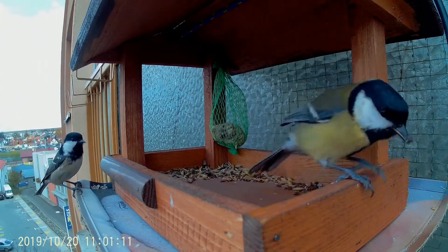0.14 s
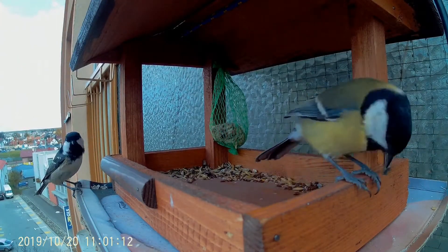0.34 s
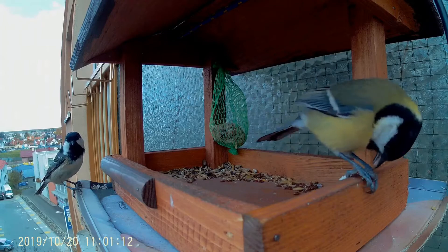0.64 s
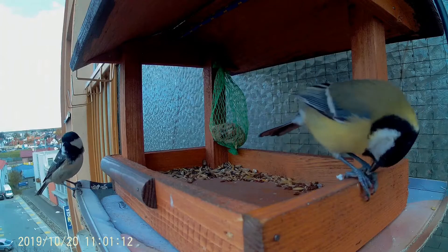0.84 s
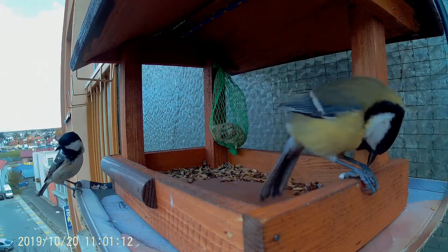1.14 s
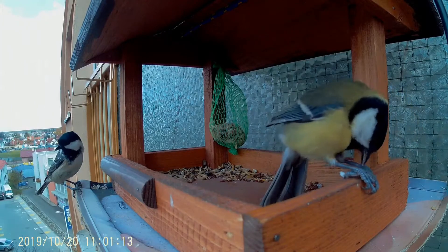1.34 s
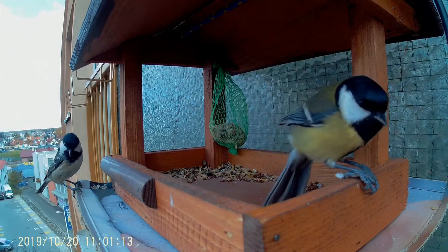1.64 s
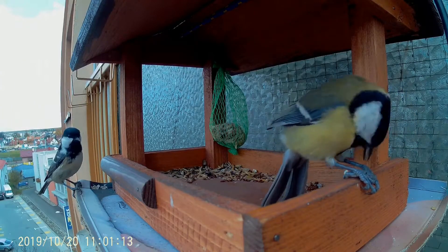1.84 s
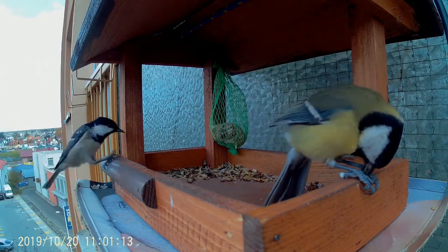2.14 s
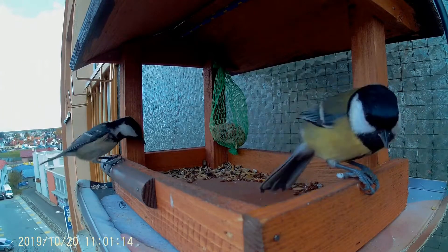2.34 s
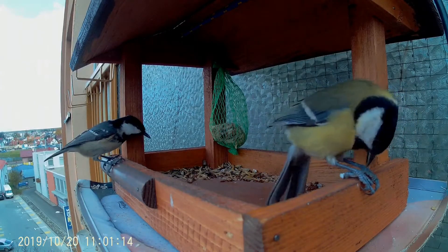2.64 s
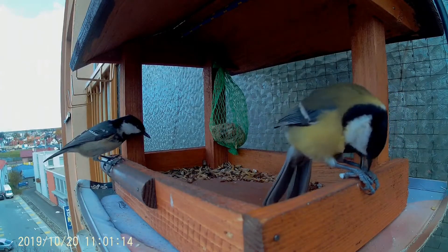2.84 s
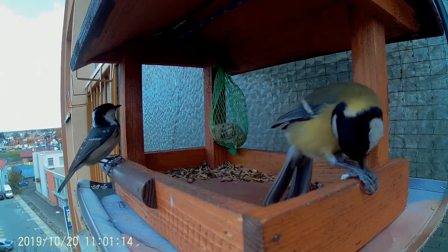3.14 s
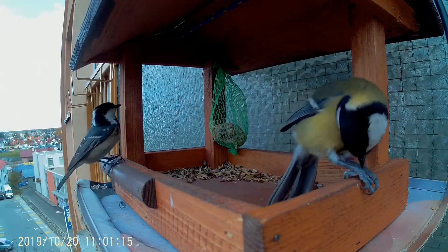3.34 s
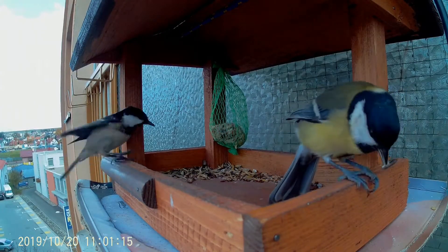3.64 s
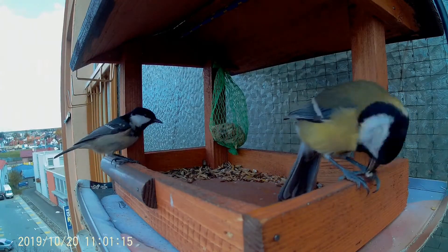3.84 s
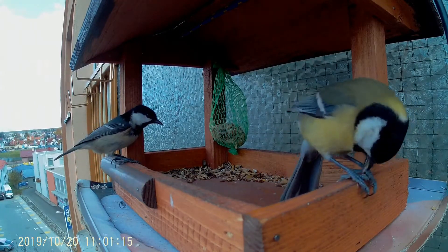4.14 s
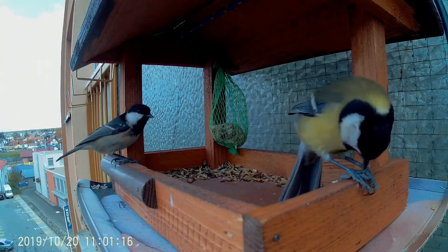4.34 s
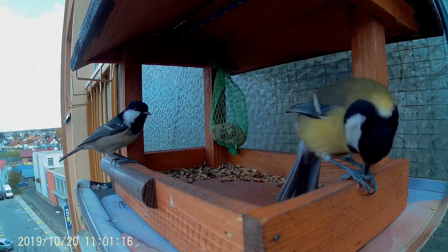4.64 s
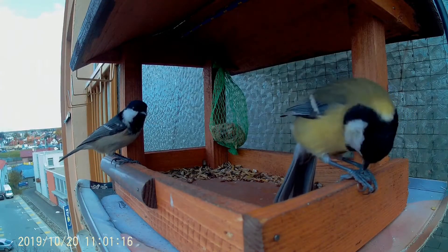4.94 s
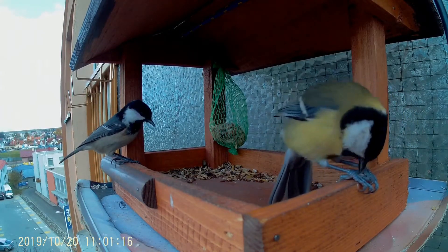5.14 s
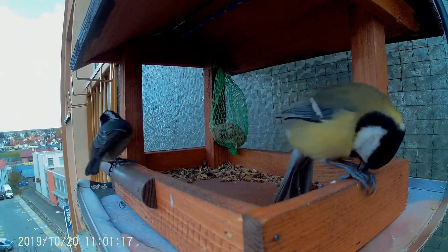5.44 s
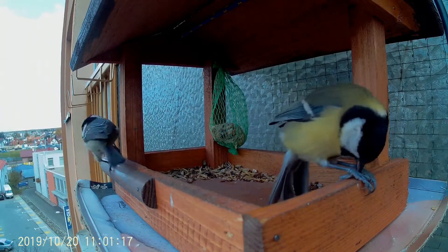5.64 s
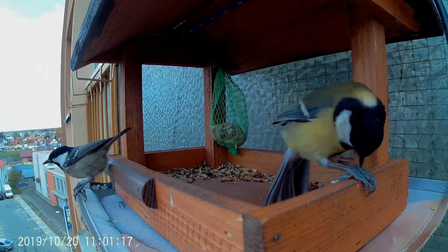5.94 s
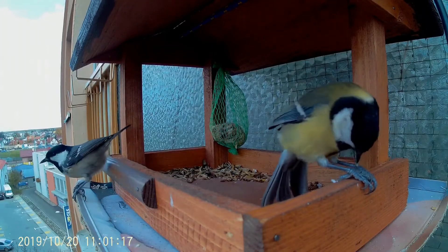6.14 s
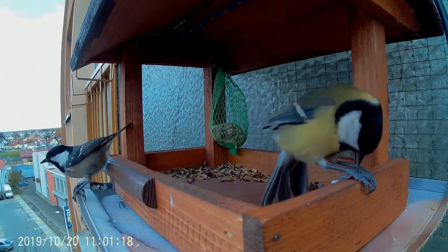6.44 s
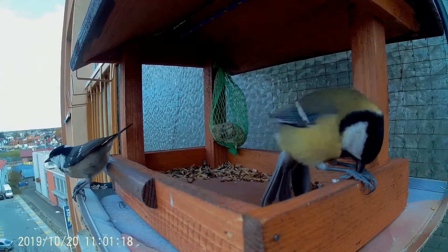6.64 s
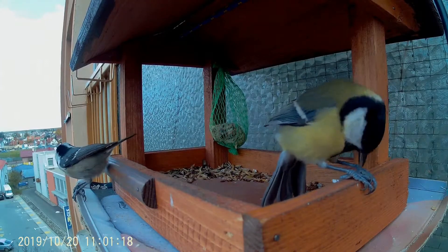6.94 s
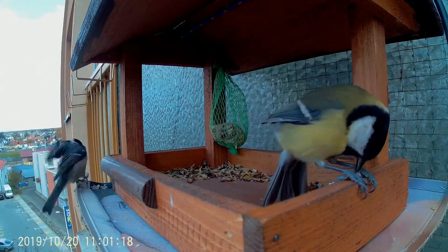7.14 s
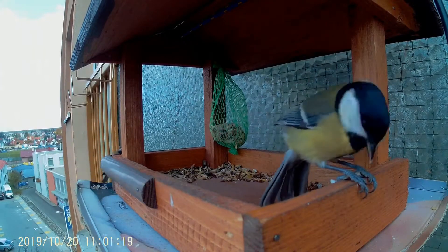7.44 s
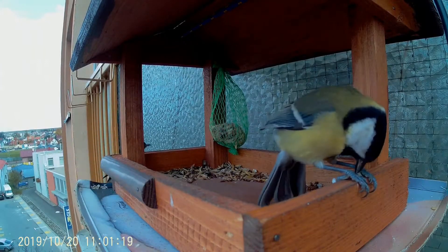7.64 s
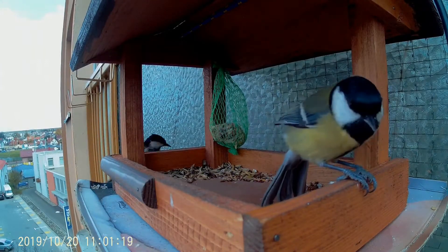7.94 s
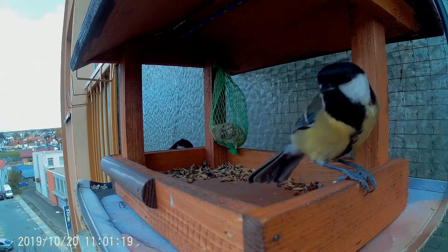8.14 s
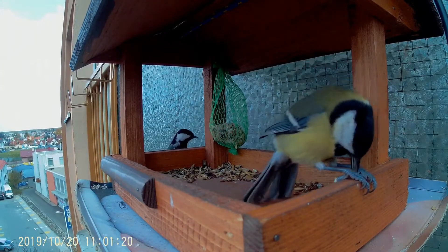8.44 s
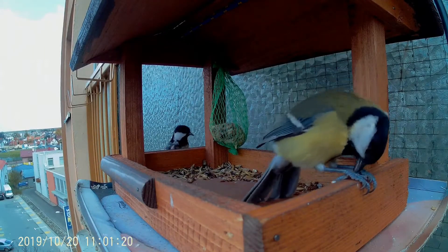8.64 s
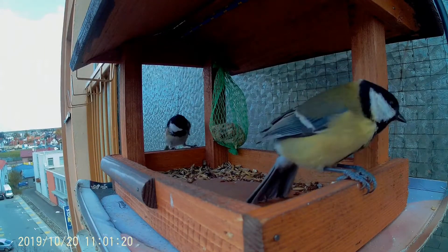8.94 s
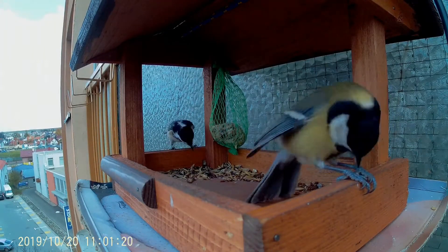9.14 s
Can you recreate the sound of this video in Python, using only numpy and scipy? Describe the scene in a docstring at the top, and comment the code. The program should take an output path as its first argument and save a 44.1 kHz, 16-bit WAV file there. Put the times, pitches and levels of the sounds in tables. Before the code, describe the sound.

Outdoors at a window feeder, with the microphone on the small wooden tray. Low wind rumbles throughout over faint hiss, booming in the hollow floor. A beak knock and scrape open at 0 s, followed by light taps and scratching around 0.3 and 0.7 s, then firmer blows from 1.1 to 1.6 s. At 2.06 s a tiny, very high chirp coincides with a knock and scrape; a gust and rattling contacts follow at 2.3-2.5 s. Quick pecks cluster at 3.2-3.8 s. After sparser taps, sharp hollow knocks land at 4.4 and 4.8-5.0 s. Pecks and crisp shell cracks continue from 5.2 to 7.2 s, with strong jolting gusts at 5.9-6.6 s and a fainter chirp at 6.33 s. Gusts return at 7.4 and 8.1 s. Cracks and a brief low claw hum come near 8.2 s; final taps cluster around 8.9 s under continuing wind.

```python
"""Gusts rumble at a microphone on the wooden tray of a window feeder and boom in its floor; band-limited noise hisses.
From the start a small bird hammers a seed: filtered noise and random slips scrape the wood, bursts of fractures
crack the shell, and blows ring decaying modes of rim and floor. Near 2.1 s and 6.3 s a second bird chirps with
two gliding sines, one for each half of its voice box. Near 8.2 s a juddering claw hums on the floor as one sine."""
import sys
import numpy as np
from scipy import signal
from scipy.fft import rfft, irfft, next_fast_len
from scipy.io import wavfile
from scipy.ndimage import uniform_filter1d, map_coordinates

SR = 44100
rng = np.random.default_rng(int(sys.argv[2]) if len(sys.argv) > 2 else 0)


def log_audio(samples):
    """Write samples as a 16-bit WAV file to the path given in sys.argv[1]."""
    # one column per channel
    frames = np.atleast_2d(samples).T
    # limit to full scale, then quantise
    limited = np.clip(frames, -1, 1)
    pcm = np.round(limited * 32767).astype(np.int16)
    wavfile.write(sys.argv[1], SR, pcm)


N = 409688


def amp(db):
    """Decibels to gain."""
    return 10 ** (np.asarray(db) / 20)


def unit(x):
    """x at rms 1."""
    return x / np.sqrt(np.mean(x ** 2) + 1e-20)


def along(points, hz):
    """(Hz, value) points interpolated on a log frequency axis."""
    point_hz, value = np.transpose(points)
    return np.interp(np.log(hz + 1), np.log(point_hz + 1), value)


def curve(points):
    """(seconds, value) points interpolated to one value per sample."""
    point_s, value = np.transpose(points)
    return np.interp(np.arange(N) / SR, point_s, value)


def wobble(knots_per_s):
    """A smooth random curve through normally distributed knots."""
    knots = rng.standard_normal(int(N * knots_per_s / SR) + 4)
    return map_coordinates(knots, [np.arange(N) * knots_per_s / SR])


def filtered(x, response):
    """x times a response of frequency in Hz."""
    size = next_fast_len(N + SR // 2)
    return irfft(rfft(x, size) * response(np.fft.rfftfreq(size, 1 / SR)), size)[:N]


def coloured_noise(size, spectrum):
    """Noise of a given size per sample, shaped by a spectrum in dB; rms 1."""
    return unit(filtered(size * rng.standard_normal(N), lambda hz: amp(along(spectrum, hz))))


def add(out, start_s, sound):
    """Mixes a sound in at its start time."""
    part = out[max(0, round(start_s * SR)):][:len(sound)]
    part += sound[:len(part)]


def jerks(size, count, spiky):
    """size tiny slips of random sign and very uneven strength, scattered over count samples."""
    when, strength, sign = rng.random((3, size))
    slips = np.sign(sign - .5) * (1.001 - strength) ** -spiky
    return np.bincount((when * count).astype(int), slips, count)


def ring(modes, scatter_db=0):
    """Impulse response of decaying sines; modes that start in opposite directions make it swell first."""
    hz, db, t60_s, way = np.transpose(modes)[:, :, None]
    t = np.arange(SR // 8) / SR
    decay = amp(db + scatter_db - 60 * t / t60_s)
    return np.sum(np.sign(way) * decay * np.sin(2 * np.pi * hz * t), axis=0)


# Standard deviations from blow to blow: share of each mode's frequency, dB of its decay time.
DETUNE_SHARE, DAMPING_DB = .015, 1.5


def struck(modes, force, contact_s, spread_db):
    """Randomly varied modes driven by a force smoothed over the contact time; peak 1."""
    force = np.convolve(force, np.hanning(max(3, round(contact_s * SR))))
    chance = rng.standard_normal((len(modes), 2))
    varied = [(hz * (1 + DETUNE_SHARE * a), db, t60_s * amp(DAMPING_DB * b), way)
              for (hz, db, t60_s, way), (a, b) in zip(modes, chance)]
    scatter_db = rng.normal(0, spread_db, (len(modes), 1))
    sound = signal.fftconvolve(ring(varied, scatter_db), force)
    return sound / np.abs(sound).max()


# Steady wind. Each row: time in seconds, rumble level in dB.
STEADY_WIND = [(0.0, -52.5), (0.59, -56), (1.42, -45), (2.3, -47.5), (2.48, -43), (2.69, -47.5),
               (3.39, -43), (3.91, -52), (5.38, -62), (5.69, -52.5), (6.0, -39), (6.6, -41.5),
               (6.96, -50.5), (7.19, -63), (7.35, -38), (7.63, -41), (7.79, -47), (9.29, -46)]
# Gusts on top. Each row: strongest moment in seconds, length in seconds, roar level in dB before flutter,
# extra tray boom in dB.
GUST_ROWS = [(0.842, 0.15, -44, -1), (1.194, 0.16, -37, -12), (1.407, 0.1, -35.5, -1),
             (1.785, 0.086, -41, -7), (1.96, 0.054, -36, -6), (2.402, 0.18, -32.5, 0),
             (2.575, 0.17, -34.5, 6.5), (2.874, 0.28, -53, 13), (3.032, 0.13, -49, 13),
             (3.22, 0.19, -39.5, 1), (4.064, 0.22, -46, 0), (5.92, 0.24, -39.5, 3), (6.07, 0.16, -46, 9),
             (6.161, 0.18, -36, 5.5), (6.451, 0.51, -28.5, 3), (7.357, 0.71, -37.5, 1.5),
             (7.614, 0.093, -47, 12), (7.738, 0.17, -32.5, -21), (8.08, 0.22, -30.5, -4.5),
             (8.287, 0.084, -37, 4), (8.399, 0.14, -36.5, 3.5), (8.97, 0.16, -39, -16)]
# Sharp puffs that jolt the tray. Each row: time in seconds, peak in dB.
PUFF_ROWS = [(1.182, -35), (1.215, -40), (5.971, -22), (6.06, -25.5), (6.094, -24), (6.211, -24.5),
             (6.329, -25.5), (6.456, -22.5), (7.392, -22), (7.718, -32), (8.075, -41), (8.096, -24),
             (8.353, -33.5)]
# Spectra of the steady rumble and the gusts' roar. Each row: frequency in Hz, relative density in dB per Hz.
RUMBLE_SPECTRUM = [(12, -65.5), (22, -8.5), (50, -3.5), (110, -1.5), (200, -5), (350, -7), (550, -14),
                   (800, -50), (1200, -67.5), (2000, -120)]
ROAR_SPECTRUM = [(12, -59), (25, -10), (50, -11), (110, 2.5), (230, 0.5), (350, -6), (500, -10), (650, -23),
                 (850, -37.5), (1200, -64), (2000, -120)]
# Tray floor modes. Each row: frequency in Hz, relative level in dB, t60 in seconds, first direction as a sign.
FLOOR_MODES = [(300.5, -7.5, 0.11, 1), (329.1, -3, 0.085, 1), (408.3, 2.5, 0.073, -1), (468, -24, 0.12, -1),
               (561, -24, 0.076, -1), (608.5, -22, 0.12, 1)]
GUST_RISE_SHARE = 0.35  # of a gust's length
USUAL_WIND_DB, BOOM_AT_USUAL_DB, BOOM_DB_PER_WIND_DB = -45, -50.5, 1
FLUTTER_DB, SHAKE_UNEVEN_DB = 4.5, 3  # depth of the quick swells; flutter is in gusts and boom


def boom_gain(wind_db):
    """Gain of the tray's boom, which follows the wind level."""
    return amp(BOOM_AT_USUAL_DB + BOOM_DB_PER_WIND_DB * (wind_db - USUAL_WIND_DB))


def wind():
    """Lumpy turbulence rumbles at the microphone and shakes the floor of the tray; sharp puffs jolt it."""
    t, steady_db = np.arange(N) / SR, curve(STEADY_WIND)
    roar_size, boom_power = np.zeros(N), boom_gain(steady_db) ** 2
    for peak_s, length_s, roar_db, more_boom_db in GUST_ROWS:
        start_s = peak_s - GUST_RISE_SHARE * length_s
        end_s = peak_s + (1 - GUST_RISE_SHARE) * length_s
        swell = np.interp(t, [start_s, peak_s, end_s], [0, 1, 0])
        roar_size += amp(roar_db) * swell
        boom_power += (boom_gain(roar_db) * amp(more_boom_db) * swell) ** 2

    lumps = amp(1.7 * wobble(40))
    flutter = amp(FLUTTER_DB * np.clip(wobble(14), -2, 1))
    rumble = coloured_noise(lumps, RUMBLE_SPECTRUM)
    roar = coloured_noise(lumps, ROAR_SPECTRUM)
    shake_swells = amp(SHAKE_UNEVEN_DB * np.clip(wobble(35), -2, 1))
    shaking = lumps * flutter * shake_swells * rng.standard_normal(N)
    boom = signal.fftconvolve(shaking, ring(FLOOR_MODES))[:N]

    out = amp(steady_db) * rumble + roar_size * unit(flutter) * roar + np.sqrt(boom_power) * unit(boom)
    for time_s, peak_db in PUFF_ROWS:
        jolt = struck(FLOOR_MODES, rng.standard_normal(SR // 100), contact_s=0.0017, spread_db=1.9)
        add(out, time_s - .003, amp(peak_db) * jolt)
    return out


# Hiss spectrum. Each row: frequency in Hz, relative density in dB per Hz.
HISS_SPECTRUM = [(260, -13.5), (450, 6), (850, -10), (1520, -14.5), (1840, -14), (2070, -15.5), (2590, -18),
                 (3050, -21), (3640, -19.5), (4350, -20.5), (13600, -29.5)]
HISS_DB, FULL_AT_DB, SINK_DB_PER_DB, FOLLOW_S = -56.3, -50, .6, .04


def hiss(sound):
    """Background hiss whose level rises and falls with the sound, by at most 6.6 dB below the full-hiss level."""
    noise = coloured_noise(1, HISS_SPECTRUM)
    window = round(FOLLOW_S * SR)
    power = np.abs(uniform_filter1d(sound ** 2, window, origin=window // 3))
    level_db = 10 * np.log10(power + 1e-9)
    return amp(HISS_DB + SINK_DB_PER_DB * np.clip(level_db - FULL_AT_DB, -11, 0)) * noise


# Drags of beak or claw along the wood. Each row: start in seconds, length in seconds, rim drive in dB,
# floor drive in dB.
DRAG_ROWS = [(0, 0.036, -42, -35), (0.68, 0.13, -47, -47), (0.92, 0.092, -50, -50.5),
             (1.036, 0.19, -53, -49.5), (1.082, 0.036, -42, -54), (1.101, 0.028, -48, -34),
             (2.065, 0.024, -38, -29.5), (2.907, 0.041, -51, -44.5), (4.088, 0.035, -52, -54),
             (4.152, 0.04, -56.5, -51), (4.361, 0.058, -45.5, -34), (5.562, 0.17, -55, -49.5),
             (5.743, 0.12, -54, -46), (7.296, 0.12, -49, -61), (7.595, 0.11, -57.5, -42),
             (7.767, 0.038, -50, -41), (7.874, 0.063, -55.5, -48.5), (8.085, 0.046, -47, -32),
             (8.145, 0.11, -49, -38), (8.251, .06, -56.5, -49), (8.536, 0.03, -54, -51),
             (8.65, 0.056, -56, -44), (8.942, 0.054, -48, -58)]
# Faint shuffling of claws and seeds. Each row: time in seconds, drive in dB.
SHUFFLE = [(0, -72), (.6, -65.5), (1.3, -63.5), (2.45, -64), (2.7, -61.5), (3.5, -62), (3.7, -58.5),
           (3.9, -77), (4.2, -65), (4.5, -88), (5.4, -68.5), (5.7, -64), (6.1, -68), (7.05, -73),
           (7.4, -59.5), (8.3, -67), (8.5, -77), (8.85, -61), (9.29, -80)]
# Modes of the upper rim and the seed shell. Each row: frequency in Hz, relative level in dB, t60 in seconds,
# first direction as a sign.
RIM_MODES = [(606, -9, 0.022, 1), (867.5, -16.5, 0.14, -1), (1052, -7.5, 0.02, 1), (1121, -3, 0.046, -1),
             (1223, -2.5, 0.029, 1), (1418, -13.5, 0.072, -1), (1542.5, 0.5, 0.023, 1),
             (1601, 0.5, 0.034, -1), (1858, -10, 0.021, 1), (2292, -19, 0.016, -1)]
SHELL_MODES = [(2620, -14, 0.0039, -1), (3280, -6.5, 0.0078, 1), (3710, -11.5, 0.022, -1),
               (4178, -2.5, 0.012, 1), (5050, -12.5, 0.012, -1), (5600, -11.5, 0.0026, 1),
               (6340, -12, 0.0065, -1), (7800, -11, 0.0044, 1)]
UPPER_RIM_HZ = 1330  # the upper rim modes begin here
DRAG_ATTACK_S, DRAG_RELEASE_SHARE = 0.0037, 0.61  # release as a share of the drag's length
RASP_UNEVEN_DB, RASP_LIFT_DB = 3, -0.5  # depth of the quick swells; tilt of the upper rim modes


def answer(force, modes):
    """Modes driven by a continuous force, with an impulse response of unit energy."""
    response = ring(modes)
    return signal.fftconvolve(force, response / np.linalg.norm(response))[:N]


def scraping():
    """Slips excite rim and shell, noise the floor: a dense rasp in the drags, sparser grains throughout."""
    t = np.arange(N) / SR
    rim_force, floor_force = np.zeros((2, N))
    for start_s, length_s, rim_db, floor_db in DRAG_ROWS:
        attack = (t - start_s) / DRAG_ATTACK_S
        release = (start_s + length_s - t) / (DRAG_RELEASE_SHARE * length_s)
        pressure = np.clip(np.minimum(attack, release), 0, 1)
        rim_force += amp(rim_db) * pressure
        floor_force += amp(floor_db) * pressure
    rasp = unit(jerks(size=9000, count=N, spiky=0.19) * amp(RASP_UNEVEN_DB * wobble(70)))
    grains = unit(jerks(size=8000, count=N, spiky=0.26) * amp(4.4 * wobble(30)))
    slips = rim_force * rasp + amp(curve(SHUFFLE)) * grains
    rim = [(hz, db + RASP_LIFT_DB * (hz > UPPER_RIM_HZ), t60_s, way) for hz, db, t60_s, way in RIM_MODES]
    floor = answer(floor_force * rng.standard_normal(N), FLOOR_MODES)
    return answer(slips, rim) + amp(-22.5) * answer(slips, SHELL_MODES) + floor


# Cracks of the shell. Each row: time in seconds, peak of the shell part in dB.
CRACK_ROWS = [(0.017, -60), (1.099, -51.5), (1.482, -53), (1.5828, -52), (3.586, -54), (3.672, -57),
              (3.7024, -61), (4.365, -57), (4.852, -54), (4.972, -53), (5.237, -50.5), (5.403, -57),
              (5.618, -55), (5.7582, -51), (5.89, -44), (5.918, -49.5), (6.1757, -53), (6.272, -56),
              (6.584, -52.5), (6.673, -56), (6.814, -56), (6.856, -53), (7.176, -53), (7.332, -47.5),
              (7.515, -54), (7.625, -47), (8.1, -56), (8.174, -46), (8.1915, -44), (8.949, -52.5)]
# Lift of the shell modes above 4600 Hz in a usual crack, and its loss per dB of extra level.
USUAL_CRACK_DB, TREBLE_DB, DULLING_DB_PER_DB = -54, -0.5, 0.54


def splits():
    """The seed shell cracks in a short burst of fractures that also rings the rim; a bigger crack is duller."""
    out, t = np.zeros(N), np.arange(SR // 80) / SR
    for time_s, peak_db in CRACK_ROWS:
        lift_db = TREBLE_DB - DULLING_DB_PER_DB * (peak_db - USUAL_CRACK_DB)
        shell_modes = [(hz, db + lift_db * (hz > 4600), t60_s, way) for hz, db, t60_s, way in SHELL_MODES]
        fractures = amp(-60 * t / 0.066) * jerks(size=20, count=len(t), spiky=0.43)
        fractures[0] = 2
        shell = struck(shell_modes, fractures, contact_s=.0001, spread_db=3.5)
        rim = struck(RIM_MODES, fractures, contact_s=.0001, spread_db=1.8)
        add(out, time_s - .0006, amp(peak_db) * (shell + amp(1.5) * rim))
    return out


# Contacts of beak and claws. Each row: time in seconds, tick peak in dB before the radiation filter,
# lift of the upper rim modes in dB, thud over the tick in dB.
PECK_ROWS = [(0.019, -29, -6, -16.5), (0.306, -46, -2, 6), (0.338, -35.5, -12, 11.5),
             (0.376, -42.5, -7, 15.5), (0.611, -36, 0, 2.5), (0.676, -38, -4, 2.5), (0.699, -39, 8, -4),
             (0.724, -37, 5, -23), (0.744, -40, 10, -17), (0.803, -41, 0, -11), (0.917, -45, 3, 3),
             (0.961, -39, -3, -16.0), (1.112, -25.5, -1, 0.5), (1.142, -46, -5, -8.0), (1.189, -46, 1, 1),
             (1.329, -43.5, 12, -9), (1.447, -26, 0.5, 16), (1.482, -30.5, 2, 5.5), (1.583, -27, -1.5, 2.5),
             (1.595, -31.5, -15, 12.5), (2.059, -27, -6.5, -0.5), (2.277, -26.5, -6, 9),
             (2.317, -33, 11, 0.5), (2.336, -36, 2, 0), (2.344, -38, -4, -5), (2.366, -38.5, -7, -2),
             (2.387, -32.5, 9, -21), (2.412, -43, -6, 2), (2.421, -42.5, 0, 4), (2.434, -42, -1, 4),
             (2.467, -36.5, 14, -1), (2.907, -36, 2, 1.5), (3.161, -38, 21, 3), (3.242, -43, 5, 7),
             (3.261, -33, -3, 1), (3.374, -32, -10, 17), (3.4, -33.5, -7, 11.5), (3.587, -29, -3, 17.5),
             (3.597, -40, 10, -9), (3.611, -31, 7, -9.0), (3.631, -38, 6, 3), (3.649, -44, 19.0, -12),
             (3.674, -39.5, 11, 0), (3.702, -40, 12, -1), (3.732, -49, 10.0, -5), (3.743, -40, 19, 5.5),
             (3.782, -39.5, 3, 6.5), (3.799, -41, -2, 0), (3.821, -39, 9, 2.0), (3.836, -35.5, 2, -0.5),
             (4.026, -47, -2, 5), (4.077, -38, -4, -6), (4.148, -43.5, -8, 8.5), (4.226, -40, -5, -5),
             (4.271, -47.5, -13, 7), (4.365, -28, 6, 9.5), (4.387, -37, -3, -8), (4.738, -46, -1, -14),
             (4.833, -30, -4, 19), (4.852, -23.5, -7, 3.5), (4.972, -21, -9.5, 6.5), (4.985, -35, 0.0, 11),
             (5.124, -51, -6, -39), (5.182, -51.5, 3, 6.5), (5.235, -33, -3, 11), (5.269, -42.5, -3, 9),
             (5.4, -26.5, -1, 11), (5.442, -43, 5, 8), (5.507, -35, 4, -3.5), (5.572, -41.5, 4, 0),
             (5.619, -31, 10, -2), (5.664, -42, -4, -12), (5.762, -27.5, 2, -2.5), (5.776, -36, -1, 4),
             (5.802, -37.5, 17, 1.5), (5.827, -45, 9, 5), (5.896, -39, -2, -8), (5.914, -41.5, 7, -4),
             (6.18, -26, 5, 3), (6.239, -38.5, -5, 12), (6.272, -31, 1, -11), (6.547, -29.5, 1, 11.5),
             (6.583, -33, -1, 7.5), (6.674, -28.5, 4, 17.5), (6.813, -24.5, -4.5, 14),
             (6.857, -35.5, -4, 9), (7.15, -29, -2.5, 12.5), (7.173, -36.5, -1, 7), (7.593, -30, 4, 2.5),
             (7.774, -39.5, -1, 6), (7.929, -39.5, 9, 3), (8.104, -50, -1, -4), (8.195, -39, -2.0, -10),
             (8.222, -43, 9, -8.0), (8.587, -46.5, 0, 11.5), (8.645, -35.5, 8, 6), (8.74, -47, -2, 0),
             (8.8, -34, -4, 15), (8.888, -44, -5.0, 2.0), (8.905, -35, -2, -19), (8.935, -29.5, -4, 15.5),
             (8.95, -28, 2, -18), (8.96, -45, 1.0, -8.0), (8.979, -42, -3, -12)]
UPPER_RIM_END_HZ = 2000
CHATTER_DB, CHATTER_T60_S = -4, .032  # the seed's rattle just after a contact
RADIATES_HZ = 123  # the small tray gives off little below this


def pecks():
    """Every contact ticks on the rim, chatters as the seed settles and thuds in the floor."""
    out, t = np.zeros(N), np.arange(SR // 16) / SR
    for time_s, tick_db, lift_db, thud_db in PECK_ROWS:
        force = amp(CHATTER_DB - 60 * t / CHATTER_T60_S) * jerks(size=60, count=len(t), spiky=0.22)
        force[0] = 1
        floor_force = np.r_[1, amp(-9) * force[1:]]
        rim = [(hz, db + lift_db * (UPPER_RIM_HZ < hz < UPPER_RIM_END_HZ), t60_s, way)
               for hz, db, t60_s, way in RIM_MODES]
        tick = struck(rim, force, contact_s=0.00048, spread_db=1.84)
        thud = struck(FLOOR_MODES, floor_force, contact_s=0.0012, spread_db=2.5)
        add(out, time_s - .001, amp(tick_db) * tick)
        add(out, time_s - .0011, amp(tick_db + thud_db) * thud)
    return filtered(out, lambda hz: (1j * hz / (RADIATES_HZ + 1j * hz)) ** 2)


# Chirps. Each row: a pair of voice-box halves, upper then lower. Each half: start in seconds, length in seconds,
# low end of the glide in Hz, high end in Hz, middle of the glide in seconds, glide time constant in seconds,
# level in dB before throat and fade.
CHIRP_ROWS = [((2.0605, .026, 3000, 8600, 2.064, .0033, -47), (2.062, .043, 5130, 7200, 2.091, .0025, -48)),
              ((6.333, .031, 7400, 8450, 6.340, .0025, -52), (6.334, .032, 6350, 7120, 6.342, .002, -52))]
CHIRP_ATTACK_S, CHIRP_RELEASE_S, CHIRP_FADE_DB_PER_S = .006, .009, 110
THROAT_HZ, THROAT_WIDTH_HZ, THROAT_DB = 6950, 800, 9  # a note swells where it passes this resonance


def chirps():
    """Each half of the voice box sings a gliding tone; coupling adds a faint octave and a difference tone."""
    out = np.zeros(N)
    for halves in CHIRP_ROWS:
        start_s, length_s, low_hz, high_hz, middle_s, glide_s, db = np.transpose(halves)[:, :, None]
        t = start_s.min() + np.arange(SR // 16) / SR
        hz = low_hz + (high_hz - low_hz) / (1 + np.exp((middle_s - t) / glide_s))
        attack = (t - start_s) / CHIRP_ATTACK_S
        release = (start_s + length_s - t) / CHIRP_RELEASE_S
        gate = np.clip(np.minimum(attack, release), 0, 1) ** 2
        throat_db = THROAT_DB / (1 + ((hz - THROAT_HZ) / THROAT_WIDTH_HZ) ** 2)
        upper_size, lower_size = gate * amp(db + throat_db - CHIRP_FADE_DB_PER_S * (t - start_s))
        upper_phase, lower_phase = 2 * np.pi * np.cumsum(hz, axis=1) / SR
        upper = upper_size * np.sin(upper_phase)
        lower = lower_size * (np.sin(lower_phase) + amp(-30) * np.sin(2 * lower_phase))
        difference = amp(-19) * np.sqrt(upper_size * lower_size) * np.sin(2 * lower_phase - upper_phase)
        add(out, t[0], upper + lower + difference)
    return out + amp(-17) * np.roll(out, round(0.01 * SR))  # the window pane answers


# A claw judders on the floor near its main mode. The one row: start in seconds, length in seconds,
# frequency in Hz, peak in dB.
JUDDER = (8.163, .062, 412, -26.5)


def judder():
    """Steady quick slips hold the floor humming for a moment: one sine that swells and fades."""
    start_s, length_s, hz, peak_db = JUDDER
    out, t = np.zeros(N), np.arange(round(length_s * SR)) / SR
    swell = np.sqrt(np.sin(np.pi * t / length_s))
    add(out, start_s, amp(peak_db) * swell * np.sin(2 * np.pi * hz * t))
    return out


def scene():
    """All sources at one microphone."""
    return (wind() + scraping() + splits() + pecks() + chirps() + judder())[None]


TOP_HZ = 15700


def record(dry):
    """Hiss is added; nothing above the band limit is kept."""
    return filtered(dry[0] + hiss(dry[0]), lambda hz: hz < TOP_HZ)[None]


dry = scene()
out = record(dry)
log_audio(out)
```